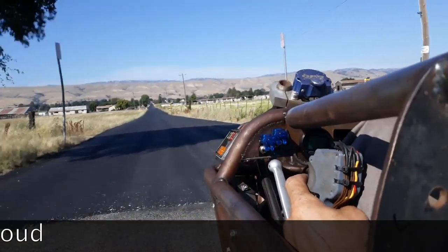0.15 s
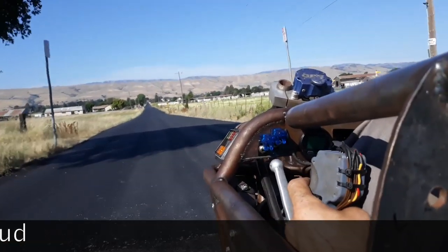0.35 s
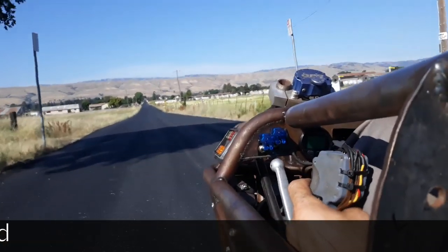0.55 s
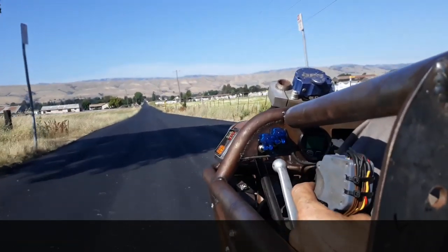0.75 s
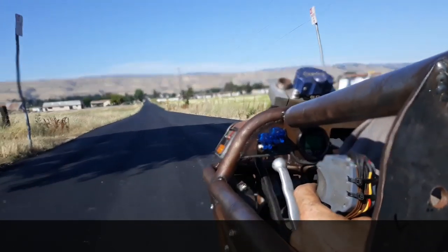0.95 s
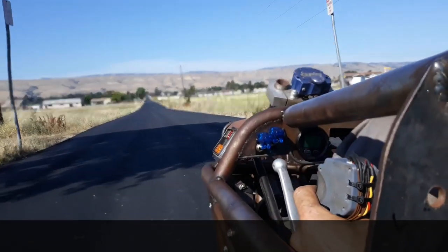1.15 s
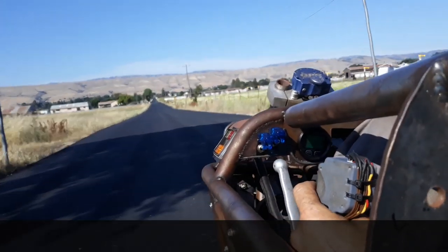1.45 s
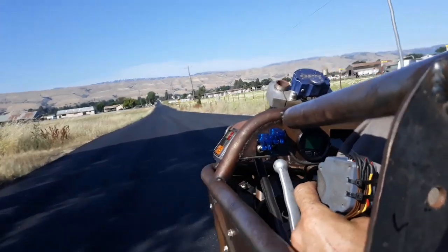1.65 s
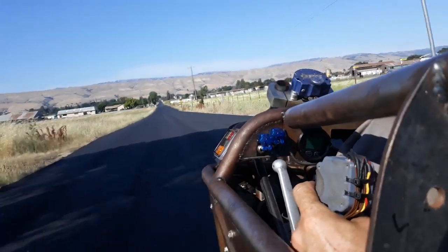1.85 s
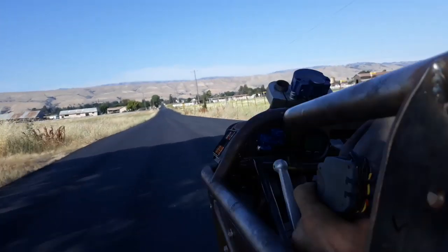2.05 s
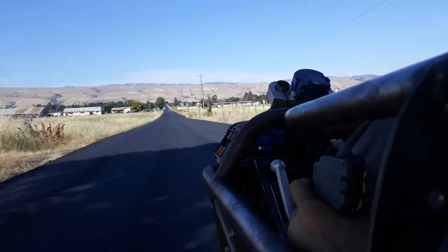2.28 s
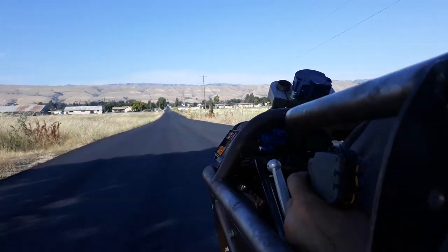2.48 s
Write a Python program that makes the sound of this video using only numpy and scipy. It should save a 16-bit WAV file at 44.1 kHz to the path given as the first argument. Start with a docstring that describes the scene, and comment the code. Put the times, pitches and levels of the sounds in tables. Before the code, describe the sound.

Metal wheels grinding on asphalt, close in stereo inside a cockpit. Faint coasting hiss and wheel singing first; bumps and scrapes at 0.1-0.3 s. From 0.3 to 1.1 s, loud juddering rattle, hollow frame drone and gritty crunch. It then weakens unevenly, with bumps near 1.85 and 2.15 s. Around 2.35 s the wheels lift, ringing out over soft air and tyre noise.

```python
"""In the cockpit of a streamlined motorcycle: its small metal training wheels touch down on asphalt.
Tiny random hits from the road's grain, shaped by resonances, make the frame drone and the wheels and
struts clatter. Bumps are fading bursts, and scrapes are short swells of bright crunching.
The wheels' singing is made of wavering sine tones. When the wheels lift they ring on faintly
over the hiss and rumble of coasting, which are filtered noise."""
import sys
import numpy as np
from scipy import signal
from scipy.fft import rfft, irfft, next_fast_len
from scipy.io import wavfile
from scipy.ndimage import uniform_filter1d, map_coordinates

SR = 44100
rng = np.random.default_rng(int(sys.argv[2]) if len(sys.argv) > 2 else 0)


def wav_record(signal):
    """Record a signal, one row per channel, as 16-bit PCM in the file named by sys.argv[1]."""
    frames = np.transpose(np.atleast_2d(signal))
    bounded = np.clip(frames, -1, 1)
    # unit amplitude maps onto the largest positive 16-bit level
    quanta = np.round(bounded * 32767).astype(np.int16)
    wavfile.write(sys.argv[1], SR, quanta)


N = 116865

# How strongly the road shakes each group of parts, before each part's own trim:
# (t/s, frame level/dB, shell level/dB, panel and grinding level/dB, clatter level/dB)
ROAD_LEVELS = [(0.0, -52.5, -60, -51.5, -51.5), (0.095, -62, -64, -78, -56.5), (0.11, -51, -59, -46, -46.5),
               (0.15, -38.5, -33, -37, -39.5), (0.255, -47.5, -50, -43, -43), (0.29, -39, -38, -38.5, -40),
               (0.32, -30, -32.5, -40, -46.5), (0.4, -35, -31, -42, -47.5), (0.42, -31.5, -36.5, -43, -41),
               (0.46, -37, -40.5, -39.5, -45.5), (0.52, -35.5, -35.5, -33.5, -40),
               (0.55, -30, -34.5, -35.5, -45.5), (0.611, -29.5, -36.5, -37.5, -44),
               (0.63, -46, -40, -33.5, -38.5), (0.66, -36.5, -31.5, -38.5, -43.5),
               (0.75, -45.5, -40.5, -38.5, -44), (0.82, -42.5, -38, -37, -40),
               (0.86, -32.5, -40, -37.5, -45), (0.96, -35.5, -29.5, -34.5, -40),
               (1.02, -36.5, -33.5, -37, -46), (1.13, -51.5, -51, -40, -46.5),
               (1.169, -38.5, -39, -39.5, -46), (1.215, -55, -48.5, -48, -57.5),
               (1.251, -44, -47, -42, -46), (1.291, -50, -51.5, -53, -60), (1.39, -37.5, -47, -41.5, -49.5),
               (1.48, -48.5, -44.5, -47, -57.5), (1.51, -42.5, -40.5, -48, -53),
               (1.54, -42, -46, -45.5, -53), (1.79, -45.5, -47.5, -50, -57.5), (1.8, -39, -35, -45.5, -49),
               (1.83, -46, -57, -52.5, -60.5), (1.931, -48, -37.5, -42.5, -51.5),
               (1.97, -44.5, -53.5, -51.5, -62), (2.06, -47, -49, -53.5, -54.5),
               (2.08, -38.5, -38.5, -48.5, -56.5), (2.19, -43, -45, -46, -49), (2.29, -44.5, -43, -42, -48),
               (2.39, -53.5, -65, -47.5, -52), (2.43, -70, -74, -56, -66), (2.65, -74, -81, -77, -61)]


def rolling():
    """The wheels' contact with the road shakes frame, shell, panels and struts, and grinds the surface."""
    times, *levels = np.transpose(ROAD_LEVELS)
    frame_db, shell_db, panels_db, clatter_db = [np.interp(np.arange(N) / SR, times, db) for db in levels]
    judder_db = 1.7 * judder()
    road = asphalt(1500, spread_db=1.0, smooth=0.92)
    grain = asphalt(500, spread_db=2.5, smooth=1.0)
    sound = frame_drone(road, frame_db) + shell_note(road, shell_db)
    sound = sound + panels(grain, panels_db + judder_db / 2)
    sound = sound + struts(grain, clatter_db + judder_db)
    sound = sound + grinding(grain, panels_db + judder_db)
    sound = sound + grit(clatter_db + judder_db)
    return sound + rumble(frame_db)


# Resonances of the frame: (f/Hz, width/Hz, level/dB)
FRAME_MODES = [(277, 11, 0), (298, 16, -6)]
# The body's lowest resonance: (f/Hz, width/Hz, level/dB)
BOOM_MODE = [(220, 28.5, 0)]
FRAME_DB, BOOM_DB = -1, -10  # trims
BOOM_LIMIT_DB = -41  # the boom follows the frame's level only up to here, before its trim


def frame_drone(road, level_db):
    """The frame drones in its modes, with the body's lowest mode booming below."""
    drone = droning(road, body(FRAME_MODES, low_hz=228, high_hz=313), level_db + FRAME_DB)
    boom_db = np.minimum(level_db, BOOM_LIMIT_DB) + BOOM_DB
    boom = droning(road, body(BOOM_MODE, low_hz=193, high_hz=255), boom_db)
    return filtered(drone + boom, lambda hz: 1 / np.sqrt(1 + (180 / (hz + 1)) ** 20))  # fades below 180 Hz


# Resonances of the shell: (f/Hz, width/Hz, level/dB)
SHELL_MODES = [(509, 15, 8.5), (605, 47, -12)]
SHELL_DB = 0  # trim


def shell_note(road, level_db):
    """The shell hums mostly on one narrow resonance."""
    return droning(road, body(SHELL_MODES, low_hz=412, high_hz=560), level_db + SHELL_DB)


# Resonances of the panels: (f/Hz, width/Hz, level/dB)
PANEL_MODES = [(611.5, 100, 0), (679, 18, 2), (752, 14, 3.5), (870, 70, -9), (1005, 50, -6), (1162, 18, -2),
               (1308, 12, -8)]
PANELS_DB = -.5  # trim


def panels(grain, level_db):
    """Panels ring in several modes as the road's grain shakes them; louder and softer with the jolts."""
    return amp(level_db + PANELS_DB) * droning(grain, body(PANEL_MODES, low_hz=580, high_hz=1250), 0)


# Resonances of the struts: (f/Hz, width/Hz, level/dB)
STRUT_MODES = [(1549, 45, -3), (1765, 50, -1), (1950, 45, -3), (2100, 50, 0), (2435, 40, 1.5),
               (2680, 55, -1), (2828, 50, -2), (3300, 24, .5), (3620, 35, -6), (4930, 70, -7)]
STRUTS_DB = -2.5  # trim
RATTLE_PER_S, RATTLE_DB = 70, 2.5  # speed and size of each part's own level swings


def struts(grain, level_db):
    """Loose metal parts ring at their own fixed pitches, each in fine, independent bursts."""
    parts = 0
    for hz, width, db in STRUT_MODES:
        swing_db = RATTLE_DB * np.clip(wobble(RATTLE_PER_S), -2, 1)
        ring = signal.lfilter(*signal.iirpeak(hz, hz / width, SR), grain * amp(swing_db))
        parts = parts + amp(db) * ring
    band = lambda hz: 1 / np.sqrt(1 + (1400 / (hz + 1)) ** 10 + (hz / 5500) ** 10)
    return amp(level_db + STRUTS_DB) * droning(parts, band, 0)


# Tone colour of dull grinding: (f/Hz, level/dB per Hz)
GRIND_COLOUR = [(130, -71), (210, -6.5), (380, 3), (580, -3), (1100, -3), (1450, -11), (2400, -14.5),
                (5000, -38.5)]
GRIND_DB = -5.5  # trim


def grinding(grain, level_db):
    """The road's grain grinds dully, coloured by a fixed spectrum."""
    return driven(grain, colour(GRIND_COLOUR), level_db + GRIND_DB)


# Tone colour of bright grit: (f/Hz, level/dB per Hz)
GRIT_COLOUR = [(200, -42), (900, 4.5), (2700, -4.5), (4500, -3), (5600, -10.5), (7200, -5), (8600, -30),
               (10500, -31), (12500, -17.5), (15700, -30)]
GRIT_DB = -4  # trim


def grit(level_db):
    """Dense, uneven little hits give a bright gritty clatter."""
    hits = asphalt(1500, spread_db=4.5, smooth=1.0)
    return driven(hits, colour(GRIT_COLOUR), level_db + GRIT_DB)


# Tone colour of the low rumble: (f/Hz, level/dB per Hz)
RUMBLE_COLOUR = [(25, -1), (50, -8), (75, 5.5), (250, -20.5)]
RUMBLE_DB = -28  # trim


def rumble(level_db):
    """Deep filtered noise that swells along with the frame."""
    noise = ports(rng.standard_normal((2, N)))
    return driven(noise, colour(RUMBLE_COLOUR), level_db + RUMBLE_DB)


# Wheels bump down on the road: (t/s, level/dB)
BUMPS = [(0.104, -40.5), (0.264, -38.5), (1.851, -40), (2.159, -35.5)]
BUMP_T60_S = 0.14  # time to fade by 60 dB


def bumps():
    """A wheel lands and chatters briefly on the road: a dull burst of hits that dies away."""
    t = np.arange(N) / SR
    chatter = 0
    for start, db in BUMPS:
        fade_db = -60 * np.maximum(t - start, 0) / BUMP_T60_S
        chatter = chatter + (t >= start) * amp(db + fade_db)
    force, dull = asphalt(4000, spread_db=2, smooth=0.78), colour(GRIND_COLOUR)
    return filtered(chatter * force, dull) / np.std(filtered(force, dull))


# Hard scrapes over rough spots: (t/s of the peak, level/dB, length/s)
SCRAPES = [(0.15, -39.5, 0.062), (0.287, -34, 0.018), (0.419, -40, 0.022), (0.5, -38.5, 0.02),
           (0.624, -43, 0.049), (0.847, -37, 0.019), (0.937, -40.5, 0.013), (0.997, -39, 0.033),
           (1.385, -46.5, 0.028), (1.627, -44.5, 0.0072), (1.922, -45.5, 0.0089), (2.167, -44, 0.02),
           (2.254, -55, .015), (2.327, -45, 0.021)]
# Tone colour of a scrape: (f/Hz, level/dB per Hz)
SCRAPE_COLOUR = [(200, -29), (700, 8), (1500, 1), (3200, 2.5), (5000, -5), (7300, -9), (8600, -20.5),
                 (10500, -25), (12500, -24), (15700, -20)]
SCRAPE_RISE = 0.72  # the rise uses this share of the length; the fade uses the length divided by it


def scrapes():
    """Bright swells of crunching where a wheel bites into a rough spot: quick to rise, slower to fade."""
    t = np.arange(N) / SR
    swell = 0
    for peak, db, length in SCRAPES:
        width = length * np.where(t < peak, SCRAPE_RISE, 1 / SCRAPE_RISE)
        swell = swell + amp(db) * np.exp(-2 * ((t - peak) / width) ** 2)
    crunch = filtered(asphalt(2000, spread_db=3, smooth=0.73), colour(SCRAPE_COLOUR))
    return swell * unit(crunch)


# A wheel's sliding note: (start t/s, length/s, from f/Hz, to f/Hz, level/dB before its swell)
GLIDES = [(0.258, 0.065, 720, 530, -35), (2.255, 0.075, 510, 680, -42.5)]
WAVER_RAD = 0.39  # size of the random phase waver in the wheels' notes


def wheel_glides():
    """A wheel's rough note sinks as weight comes onto it and climbs as the weight comes off."""
    t, notes = np.arange(N) / SR, 0
    for start, length, from_hz, to_hz, db in GLIDES:
        part = np.clip((t - start) / length, 0, 1)
        hz = from_hz + (to_hz - from_hz) * part
        phase = 2 * np.pi * np.cumsum(hz) / SR + WAVER_RAD * wobble(70)  # fast waver sounds rough
        swell = np.sqrt(2 * abs(np.sin(np.pi * part)))
        notes = notes + amp(db) * swell * np.sin(phase)
    return ports(np.array([notes, np.zeros(N)]))


# Pitches of a freely ringing wheel, one per mode: (f/Hz)
WHEEL_HZ = [641, 2151, 2191]
# Base level of each of those modes, before load and wobble: (level/dB)
WHEEL_DB = [-65.5, -67.5, -66.5]
FREE_DB, LOADED_DB = 5.5, -1.5  # added before the wheels land, and while they bear on the road
LIFT_S, LIFT_DB, RING_OUT_S = 2.35, -41.5, .5  # the wheels leave the road; lowest mode's level; 60 dB fade


def wheel_ring():
    """The spinning wheels sing faintly, damped while they bear on the road, and ring out as they lift."""
    t = np.arange(N) / SR
    tones = [np.sqrt(2) * np.sin(2 * np.pi * hz * t + WAVER_RAD * wobble(8.9)) for hz in WHEEL_HZ]
    landing_s = BUMPS[0][0]
    load_db = np.select([t < landing_s, t < LIFT_S], [FREE_DB, LOADED_DB], 0.)
    load_db = uniform_filter1d(load_db, size=1000)  # no sudden steps
    sing = sum(amp(db + load_db + wobble(9.7)) * tone for db, tone in zip(WHEEL_DB, tones))
    rise_db = -310 * np.maximum(LIFT_S - t, 0)  # swells steeply up to the lift
    fade_db = -60 * np.maximum(t - LIFT_S, 0) / RING_OUT_S
    return sing + amp(LIFT_DB + rise_db + fade_db) * tones[0]


# Tone colour of the air and tyre noise: (f/Hz, level/dB per Hz)
AIR_COLOUR = [(25, -14), (130, 3.5), (300, 5.5), (480, -2), (830, 7.5), (1200, -3), (3000, -2.5),
              (5500, -8.5), (7300, -8.5), (8600, -23.5), (15700, -22)]
AIR_DB = -56.5  # level around which it sways


def coasting():
    """Air and tyre noise around the cockpit: coloured noise whose level sways a little."""
    sway_db = .8 * wobble(8)
    hiss = filtered(ports(rng.standard_normal((2, N))), colour(AIR_COLOUR))
    return amp(AIR_DB + sway_db) * unit(hiss)


def asphalt(rate, spread_db, smooth):
    """Tiny random impacts of the road's grain, rate per second, over a share of smooth friction noise."""
    struck = rng.random(N) < rate / SR
    strength = amp(spread_db * np.clip(rng.standard_normal(N), -2, 2))
    hits = struck * strength * rng.choice([-1, 1], (2, N))
    return ports(unit(hits) + smooth * rng.standard_normal((2, N)))


JUDDER_PER_S, JUDDER_S = 110, .012  # pebbles per second; time for a jolt to fall to about a third


def judder():
    """Level swings of rms 1: each pebble jolts the wheels at once and the jolt dies away."""
    pebbles = (rng.random(N) < JUDDER_PER_S / SR) * rng.uniform(0.28, 1, N)
    jolts = signal.lfilter([1], [1, -np.exp(-1 / (JUDDER_S * SR))], pebbles)
    return unit(np.minimum(unit(jolts - jolts.mean()), 2))


# Evens out the random swelling of the ringing noise: averaging time, and share of the evening
STEADY_S, STEADINESS = 0.04, 0.6


def droning(force, response, level_db):
    """A body kept ringing evenly at the given level: the noise's chance swells and dips are reduced."""
    ring = unit(filtered(force, response))
    power = abs(uniform_filter1d(np.mean(ring ** 2, axis=0), int(STEADY_S * SR))) + .01
    return amp(level_db) * unit(ring / power ** (STEADINESS / 2))


def driven(force, response, level_db):
    """A force whose level varies passes through a body, which rings after it."""
    return filtered(force * amp(level_db), response) / np.std(filtered(force, response))


def body(modes, low_hz, high_hz):
    """Response of a set of modes that radiate between two edges."""
    def response(f):
        ring = sum(amp(db) * 1j * f * w / (c * c - f * f + 1j * f * w) for c, w, db in modes)
        return ring / np.sqrt((1 + (low_hz / (f + 1)) ** 12) * (1 + (f / high_hz) ** 12))
    return response


# How alike left and right are: (f/Hz, likeness from 0 to 1)
ALIKE = [(60, .6), (250, .97), (550, .95), (1100, .85), (1600, .35), (2500, .25), (5000, 0.02)]
# How far the left side lags behind the right: (f/Hz, lag/radians)
LEFT_LAG = [(100, 0.49), (480, 0.72), (750, 1.2), (1100, 1.91), (1450, 1.64), (2000, 1.27)]


def ports(pair):
    """Mix two signals into left and right: most alike in the low mids, with the left a little late."""
    def shares(hz):
        turn = np.arccos(np.clip(along(ALIKE, hz), -1, 1)) / 2
        return np.array([np.cos(turn), np.sin(turn)])

    def lag(hz):
        return np.exp(.5j * along(LEFT_LAG, hz) * np.array([[-1], [1]]))
    mid, side = filtered(pair, shares)
    return filtered(np.array([mid + side, mid - side]), lag)


def colour(points):
    """Response that follows a spectrum."""
    return lambda hz: amp(along(points, hz))


def filtered(x, response):
    """x times a response of frequency."""
    m = next_fast_len(N + SR // 2)
    return irfft(rfft(x, m) * response(np.fft.rfftfreq(m, 1 / SR)), m)[..., :N]


def along(points, hz):
    """Read a value between (Hz, value) points on a log axis."""
    f, v = np.transpose(points)
    return np.interp(np.log(hz + 1), np.log(f + 1), v)


def wobble(rate):
    """A smooth random curve with rate knots a second."""
    return map_coordinates(rng.standard_normal(int(N * rate / SR) + 4), [np.arange(N) * rate / SR])


def amp(db):
    """Decibels to gain."""
    return 10 ** (np.asarray(db) / 20)


def unit(x):
    """Scale to rms 1."""
    return x / np.sqrt(np.mean(x ** 2) + 1e-20)


BALANCE_DB = -1.07  # left minus right


def scene():
    """Everything together, a little to the right."""
    sound = rolling() + bumps() + scrapes() + wheel_glides() + wheel_ring() + coasting()
    return sound * amp(BALANCE_DB * np.array([[.5], [-.5]]))


def record(dry):
    """Keep nothing at or above the band limit of 15750 Hz."""
    return filtered(dry, lambda hz: hz < 15750)


dry = scene()
out = record(dry)
wav_record(out)
```